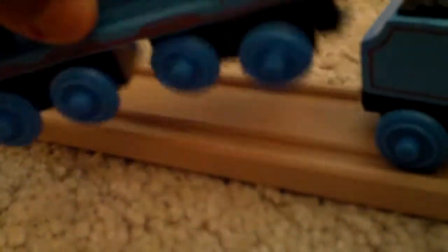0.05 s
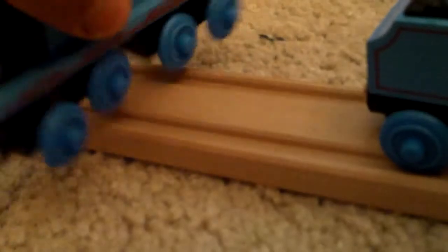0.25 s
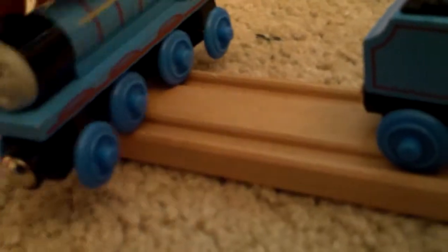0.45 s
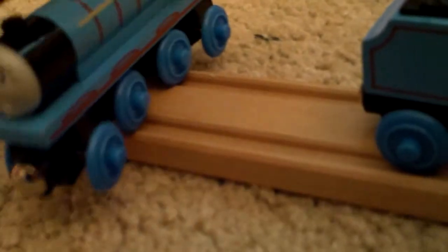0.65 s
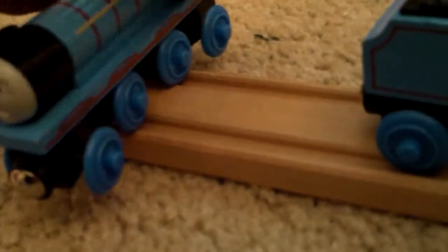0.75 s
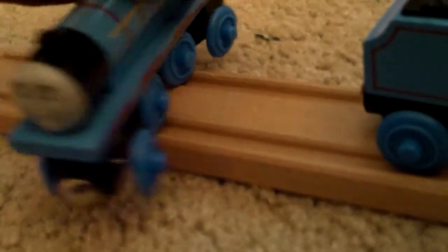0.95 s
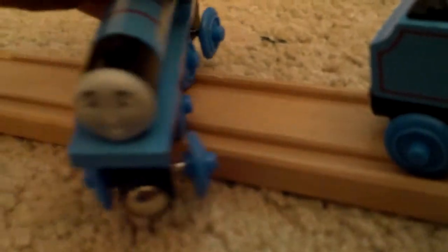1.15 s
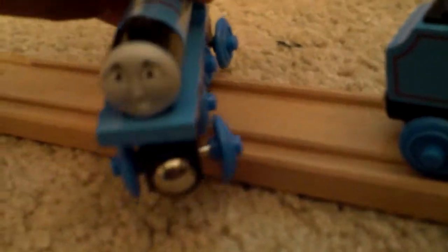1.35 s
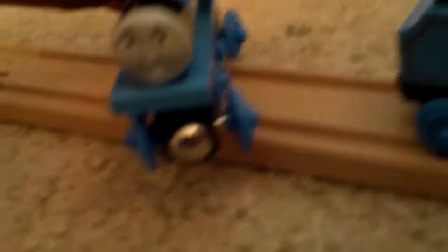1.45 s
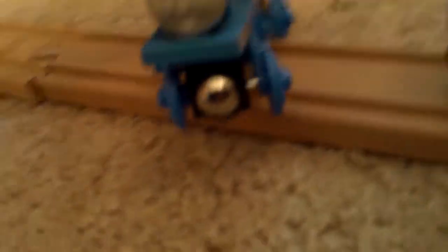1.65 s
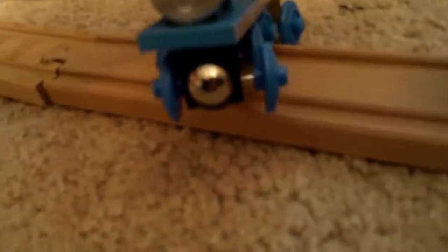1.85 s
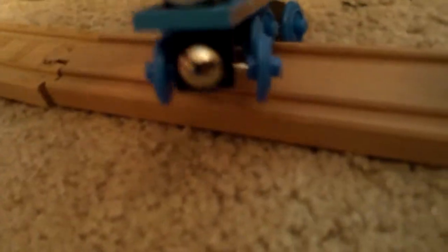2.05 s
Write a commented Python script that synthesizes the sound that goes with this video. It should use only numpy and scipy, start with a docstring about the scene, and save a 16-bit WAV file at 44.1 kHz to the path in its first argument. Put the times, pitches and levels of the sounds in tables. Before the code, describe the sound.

A wooden toy train clacks against its wooden track close by at about 0.1 seconds, with clicking wheels and tinny axles. The loudest clatter comes from 0.4 to 0.5 seconds. A lighter cluster of knocks follows at 0.8, then soft taps around 1.1 and faint bumps until 1.6, with slight wheel rubbing and hand rustle. A faint low hum, rumble and hiss continue underneath in the dry room.

```python
"""A wooden toy engine is lifted, knocked against its wooden track and set on the rails in a carpeted room.
Each impact thumps the track and excites the damped modes of the wooden body, the loose steel axles and
the plastic wheels. Between impacts the wheels chatter and rub, and hand and carpet rustle.
The toy is close by; behind it lie a low hum, a rumble and a soft hiss."""
import sys
import numpy as np
from scipy import signal
from scipy.fft import rfft, irfft
from scipy.io import wavfile
from scipy.ndimage import uniform_filter1d

SR = 44100
rng = np.random.default_rng(int(sys.argv[2]) if len(sys.argv) > 2 else 0)


def wrap_up_sound(samples):
    """Save the sound to the file named by the first command line argument, as 16-bit audio."""
    columns = np.atleast_2d(samples).T
    # keep every value between -1 and 1, then stretch to whole-number steps
    tamed = np.clip(columns, -1, 1)
    steps = np.round(tamed * 32767).astype(np.int16)
    wavfile.write(sys.argv[1], SR, steps)


N = 92610
T = np.arange(N) / SR
RING_T = np.arange(SR // 3) / SR  # time axis of one decay


def undb(db):
    """Amplitude ratio of a level in decibels."""
    return 10 ** (np.asarray(db) / 20)


def unit(x):
    """Normalisation to rms 1."""
    return x / np.sqrt(np.mean(x ** 2))


def unit_onset(x, onset_s=0.003):
    """Normalisation to rms 1 over the onset of a transient."""
    return x / np.sqrt(np.mean(x[:int(onset_s * SR)] ** 2))


def decay(t60_s):
    """Damping: the amplitude falls exponentially, by 60 dB in t60_s."""
    return np.exp(-np.log(1000) * RING_T / t60_s)


def noise(spectrum, size=N):
    """Spectral shaping of white noise by rows of (frequency_hz, level_db), at rms 1."""
    hz, db = np.array(spectrum).T
    bins_hz = np.fft.rfftfreq(size, 1 / SR)
    gain = undb(np.interp(np.log(bins_hz + 1), np.log(hz), db))
    return unit(irfft(rfft(rng.standard_normal(size)) * gain, size))


def burst(spectrum, t60_s):
    """Broadband transient: shaped noise under an exponential decay."""
    return noise(spectrum, len(RING_T)) * decay(t60_s)


def drift(rate_hz):
    """Slow random fluctuation of rms 1: white noise averaged twice over 1 / rate_hz."""
    width = int(SR / rate_hz)
    return unit(uniform_filter1d(uniform_filter1d(rng.standard_normal(N), width), width))


def envelope(levels):
    """Amplitude envelope, linear in decibels between rows of (time_s, level_db)."""
    return undb(np.interp(T, *np.array(levels).T))


def swells(spans):
    """Half-sine envelopes, one for each row of (start_s, length_s, level_db)."""
    return sum(undb(db) * np.sin(np.pi * np.clip((T - start_s) / length_s, 0, 1))
               for start_s, length_s, db in spans)


def add(out, start_s, x):
    """Superposition of a sound on the mix from its start time."""
    i = int(start_s * SR)
    out[i:i + len(x)] += x[:N - i]


def ring(modes, detune, t60_share=1, scatter_db=0.5):
    """Modal superposition: damped sines whose weights and pitches vary with the point of contact."""
    out = np.zeros(len(RING_T))
    for hz, db, t60_s in modes:
        level_draw, pitch_draw, polarity = rng.standard_normal(3)
        amplitude = np.sign(polarity) * undb(db + scatter_db * level_draw)
        pitch_hz = hz * (1 + detune * pitch_draw)
        out += amplitude * decay(t60_s * t60_share) * np.sin(2 * np.pi * pitch_hz * RING_T)
    return unit_onset(out)


def hum(pitch_hz=56.2):
    """Random frequency and amplitude modulation makes a low tone and its octave waver."""
    # course of the hum: time_s, level_db
    levels = [(0.0, -45), (0.05, -45.5), (0.17, -51.5), (0.3, -46), (0.61, -53.5), (0.62, -47.5),
              (1.07, -42.5), (1.41, -46), (1.72, -42), (2.1, -46.5)]
    phase = 2 * np.pi * np.cumsum(pitch_hz * (1 + 0.016 * drift(22))) / SR
    fundamental = undb(-drift(13)) * np.sin(phase)
    octave = undb(-14.5 + 4.9 * drift(13)) * np.sin(2 * phase)
    return np.sqrt(2) * (fundamental + octave) * envelope(levels)


def rumble():
    """Low-frequency noise under a slowly changing envelope."""
    # rumble spectrum: frequency_hz, level_db
    spectrum = [(15, -1), (30, 1), (45, 4), (75, -7), (105, -5), (135, -4), (165, -11.5), (240, -12.5),
                (400, -19), (800, -28.5), (2000, -34.5)]
    # course of the rumble: time_s, level_db
    levels = [(0, -51), (.25, -59.5), (.58, -61.5), (.76, -53.5), (1.25, -51.5), (1.45, -51.5), (1.6, -52),
              (1.8, -53), (2.1, -52.5)]
    return noise(spectrum) * envelope(levels)


def hiss():
    """Stationary broadband noise, heard as a soft hiss."""
    # hiss spectrum: frequency_hz, level_db
    spectrum = [(290, -41.5), (500, -6.5), (716, 0.5), (803, -3.5), (997, -4.5), (1290, -3), (1390, -4),
                (2260, -5.5), (15500, -13)]
    return undb(-62.5) * noise(spectrum)


def track_thump():
    """Impact response of the wooden track: low noise that is quickly damped."""
    # thump spectrum: frequency_hz, level_db
    spectrum = [(80, -29.5), (170, -5.5), (240, 3.5), (330, -5), (550, 1.5), (800, -7), (1200, -12),
                (3000, -49)]
    return burst(spectrum, t60_s=0.041)


def axle_ring(start_s):
    """Free vibration of the steel axles: loose while lifted, damped once the wheels bear on the track."""
    # axle modes: pitch_hz, level_db, undamped_by_track_t60_s
    modes = [(5410, -1, 0.057), (5410, -5, 0.02), (5517, -10, 0.033), (5394, -22.5, 0.24),
             (7890, -13.5, 0.025), (11850, -43, 0.086)]
    # freedom of the axles to ring: time_s, t60_share
    freedom = [(.1, 0.93), (.3, 0.85), (.43, 0.3), (.5, 0.24), (.81, 0.34), (.93, 0.39), (1.1, .2)]
    return ring(modes, detune=0.0024, t60_share=np.interp(start_s, *np.array(freedom).T))


def contact_hardness(rows, tilt_db_per_octave, pivot_hz=1800, soft_limit_hz=3850, soft_cut_db=25):
    """Hardness sets bandwidth: a hard contact lifts the treble, a soft one barely excites it."""
    tilted = []
    for hz, db, *rest in rows:
        db += tilt_db_per_octave * max(np.log2(hz / pivot_hz), 0)
        if tilt_db_per_octave < 0 and hz > soft_limit_hz:
            db -= soft_cut_db
        tilted.append((hz, db, *rest))
    return tilted


def contact_point(modes, favoured_hz, lift_db=10.5, width_octaves=0.094):
    """Selective excitation: the point of contact drives the modes near favoured_hz best."""
    return [(hz, db + lift_db * np.exp(-0.5 * (np.log2(hz / favoured_hz) / width_octaves) ** 2), t60_s)
            for hz, db, t60_s in modes]


def body_clack(tilt_db_per_octave, favoured_hz, cutoff_hz=890):
    """Modes and contact noise of the wooden body, too small to radiate well below cutoff_hz."""
    # body modes: pitch_hz, level_db, t60_s
    modes = [(1290, -2.5, 0.02), (1726, 1.5, 0.022), (1789, 0.5, 0.019), (1990, 2.5, 0.013),
             (2335, 0, 0.012), (2725, -7.5, 0.006), (2950, -5.5, 0.02), (3480, -2, 0.013),
             (3634, -5.5, 0.019), (4065, -8.5, 0.029), (4690, -5, 0.026), (5000, -9.5, .015),
             (5790, -9, 0.03), (6930, -11.5, .014)]
    # contact noise of wood: frequency_hz, level_db
    spectrum = [(300, -6), (1000, -21), (1450, -13.5), (1900, 0), (3500, 4.5), (5500, -22.5), (7500, -20),
                (12000, -48)]
    crack = unit_onset(burst(contact_hardness(spectrum, tilt_db_per_octave), t60_s=0.015))
    driven_modes = contact_point(contact_hardness(modes, tilt_db_per_octave), favoured_hz)
    clack = ring(driven_modes, detune=0.017) + undb(-2) * crack
    radiation = signal.butter(3, cutoff_hz, "high", fs=SR, output="sos")
    return unit_onset(signal.sosfilt(radiation, clack))


def wheel_click():
    """A plastic wheel strikes its axle head; its high, heavily damped modes give a sharp click."""
    # wheel modes: pitch_hz, level_db, t60_s
    modes = [(7950, -6, 0.02), (8450, -5.5, 0.0066), (9930, -6, 0.016), (10630, -0.5, 0.0086),
             (11286, -4, 0.022), (11400, -12, 0.024), (11870, 0, 0.0059), (13910, -12, 0.018)]
    # contact noise of plastic: frequency_hz, level_db
    spectrum = [(2000, -14), (5000, -8.5), (7000, -1.5), (10500, 0.5), (13000, -5), (14500, -11),
                (16000, -15)]
    crack = unit_onset(burst(spectrum, t60_s=0.0082))
    return unit_onset(ring(modes, detune=0.017) + undb(-3) * crack)


def impacts():
    """Impulsive excitation: each blow sets track, axles, body and wheels vibrating together."""
    # blows: start_s, thump_db, body_db, tilt_db_per_octave, axle_db, wheel_db, favoured_hz
    blows = [ (0.0686, -73, -49, 5, -67, -62, 3500), (0.0714, -64, -46.5, 5.5, -62, -61, 3500),
             (0.1, -42.5, -26.5, 4.5, -20.5, -17, 1856), (.1030, -46, -32, -1, -47.5, -33, 3500),
             (0.1103, -57, -40, 15, -31, -35, 2300), (0.116, -46, -51, 9, -28.5, -47, 1850),
             (.1374, -42.5, -53, -7.5, -56, -46, 1300), (.1393, -42.5, -43, 9, -60, -55, 2300),
             (0.1462, -68, -45, 8, -42, -48, 4100), (0.1486, -66, -52, 11, -34, -36, 4100),
             (0.152, -71, -37.5, -7, -54, -24, 1850), (0.1559, -65, -40.5, 12, -36, -30, 4170),
             (0.1597, -70, -39, 20, -32.5, -30.5, 4100), (0.1684, -73, -41, 19, -34.5, -53, 4070),
             (.1865, -52, -55, 2, -51, -54, 2000), (.2590, -56, -49.5, 0, -43, -55, 2850),
             (0.2659, -55.5, -44.5, 13, -48, -63, 5780), (0.2735, -58, -43.5, 14, -51, -54, 6900),
             (0.2883, -57.5, -44.5, 10, -64, -50.5, 4200), (.3067, -76, -58, 2, -45.5, -57, 5200),
             (0.3295, -72, -65, -9, -81, -72, 1700), (.4097, -62, -50, 15, -60, -59, 6670),
             (0.4146, -65, -58, 15, -66, -45, 2000), (0.4193, -50, -26.5, 7.5, -53, -39.5, 1300),
             (0.423, -44, -33, -1, -27, -34, 3500), (.4260, -53, -33, -8, -25, -34, 1300),
             (0.431, -58, -37, -15, -33.5, -39, 3000), (0.4344, -39, -20.5, 11, -25, -37, 3580),
             (0.4391, -44, -27, 0, -52, -40, 2300), (.4430, -41.5, -34, 0, -41, -52, 2000),
             (0.4569, -46.5, -33.5, 4, -53, -44, 1750), (0.4695, -44.5, -19, 3.5, -28.5, -31, 3500),
             (0.481, -62, -27, -3, -54, -50, 1750), (0.4819, -53, -24.5, 6.5, -30, -33, 1790),
             (0.4939, -41, -39, -3, -66, -60, 1750), (0.4986, -45.5, -34.5, 3, -55, -62, 3500),
             (.5016, -54, -39.5, 4, -49.5, -56.5, 3500), (0.5256, -49.5, -45, 1, -69, -69, 3660),
             (0.539, -60, -51.5, -15, -75, -78, 1780), (.6100, -55, -60, -21, -94, -76, 1760),
             (0.6322, -55, -53.5, -16, -82, -74, 1750), (0.796, -48, -40, -18, -52.5, -66, 1850),
             (0.8008, -47, -55, -3, -67, -72, 1300), (0.81, -51, -33, -1, -53, -50, 3000),
             (0.8188, -42, -28, -2.5, -39, -49, 3400), (.8214, -42, -34.5, -6, -34.5, -55, 1800),
             (.8584, -48, -45, -11, -69.5, -63, 2300), (.8740, -47, -73, 2, -76, -76, 1300),
             (0.91, -62, -55, -1, -77, -68, 1800), (.9264, -49.5, -51, -1, -74, -63, 3000),
             (0.9343, -47, -42.5, 5, -40, -59, 4950), (0.9459, -49, -37, -1.5, -59, -68, 1770),
             (1.0812, -48.5, -40, -24, -65, -68, 1830), (1.0948, -47, -52, -8, -64, -66, 1300),
             (1.1063, -50, -39.5, -9, -59, -59, 1300), (1.1498, -66, -49, -1, -72, -72, 2130),
             (1.368, -59, -53, -17, -80, -72, 1340), (1.3914, -56.5, -44.5, 0.5, -51.5, -60, 1290),
             (1.4834, -50.5, -63, -6, -76, -74, 1280), (1.5429, -49, -52, 1, -71, -72, 2080),
             (1.5750, -55, -60, -4, -78, -76, 2120)]
    out = np.zeros(N)
    for start_s, thump_db, body_db, tilt_db_per_octave, axle_db, wheel_db, favoured_hz in blows:
        add(out, start_s, undb(thump_db) * track_thump())
        add(out, start_s, undb(axle_db) * axle_ring(start_s))
        add(out, start_s, undb(body_db) * body_clack(tilt_db_per_octave, favoured_hz))
        add(out, start_s, undb(wheel_db) * wheel_click())
    return out


def wheel_chatter(taps_per_s=780, spread_db=8.5):
    """Loose wheels bounce on the body: a Poisson train of taps convolved with its impulse response."""
    # runs of taps: start_s, length_s, level_db
    runs = [(0.098, 0.029, -51), (0.138, 0.052, -60), (0.419, 0.03, -38.5), (0.45, .065, -46.5),
            (0.508, 0.029, -64), (0.808, 0.066, -71), (1.072, 0.045, -57.5), (1.188, 0.033, -66)]
    out = np.zeros(N)
    for start_s, length_s, db in runs:
        size = int(length_s * SR)
        contacts = rng.random(N) < taps_per_s / SR
        taps = contacts * undb(spread_db * rng.standard_normal(N))
        response = body_clack(tilt_db_per_octave=0.5, favoured_hz=3340)
        run = signal.fftconvolve(np.r_[1, taps[:size]], response)  # a tap opens every run
        add(out, start_s, undb(db) * unit_onset(run, length_s))
    return out


def hand_rustle():
    """Friction of hand and carpet gives dull, patchy noise as the toy is gripped and shifted."""
    # hand movements: start_s, length_s, level_db
    movements = [(.11, 0.073, -63), (.47, 0.072, -54.5), (.83, 0.083, -60), (.96, 0.089, -57.5),
                 (1.07, 0.077, -56.5), (1.45, 0.23, -60.5)]
    # rustle spectrum: frequency_hz, level_db
    spectrum = [(80, 9), (180, 0.5), (300, 5.5), (550, 1), (800, -11), (1500, -15), (4000, -29)]
    return swells(movements) * undb(2.6 * drift(66)) * noise(spectrum)


def wheel_rub():
    """Sliding friction of a wheel turning on its axle gives a thin, uneven hiss."""
    # spells of turning: start_s, length_s, level_db
    turns = [(0.25, .07, -62), (0.898, 0.1, -64), (1.024, .1, -56), (1.187, 0.097, -66)]
    # friction spectrum: frequency_hz, level_db
    spectrum = [(2000, -12), (5500, -18), (8000, -17), (10600, -11), (11350, 3), (12000, -17), (14300, -13),
                (16000, -27)]
    return swells(turns) * undb(2.1 * drift(150)) * noise(spectrum)


def reverberation(direct, level_db=-20.5, delay_s=0.0058):
    """Convolution with the short, diffuse impulse response of a carpeted room."""
    # spectrum of the reflections: frequency_hz, level_db
    spectrum = [(100, 3.5), (500, 7.5), (1500, -7.5), (4000, -2), (9000, -3.5), (16000, -7.5)]
    tail = burst(spectrum, t60_s=0.18) * (RING_T > delay_s)
    return undb(level_db) * signal.fftconvolve(direct, tail / np.linalg.norm(tail))[:N]


def scene():
    """Superposition of the toy's direct sound, its reverberation and the background, in one channel."""
    toy = impacts() + wheel_chatter() + wheel_rub() + hand_rustle()
    return (toy + reverberation(toy) + hum() + rumble() + hiss())[None]


def record(dry):
    """Band limiting: a steep elliptic low-pass removes the highest treble."""
    cutoff_hz = 15800
    return signal.sosfilt(signal.ellip(10, 0.2, 70, cutoff_hz, fs=SR, output="sos"), dry)


dry = scene()
out = record(dry)
wrap_up_sound(out)
```